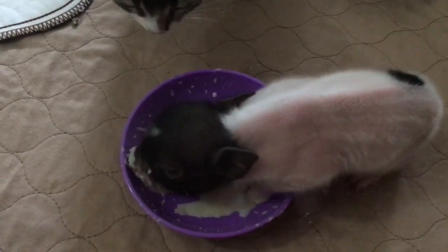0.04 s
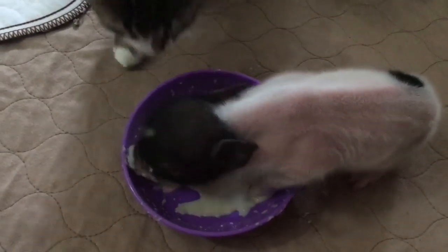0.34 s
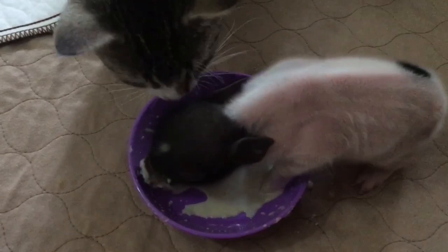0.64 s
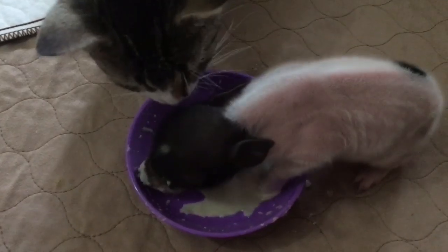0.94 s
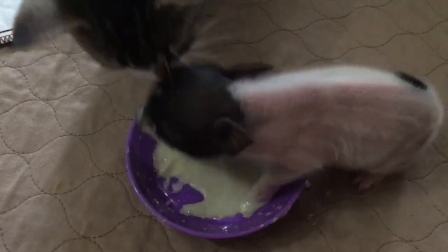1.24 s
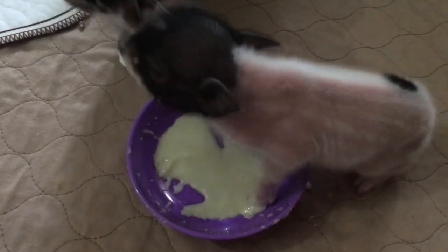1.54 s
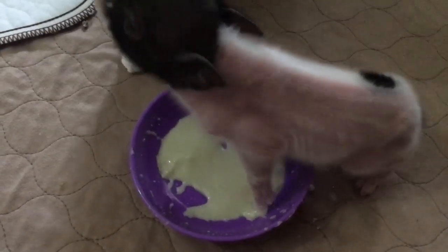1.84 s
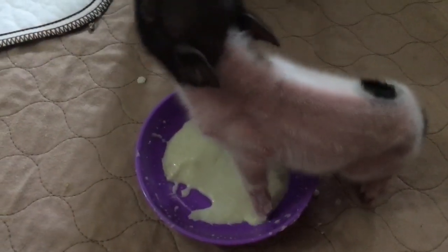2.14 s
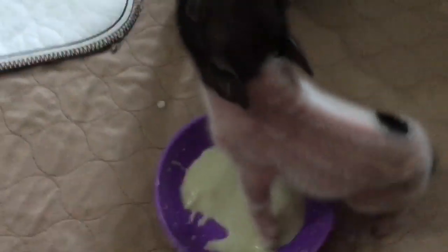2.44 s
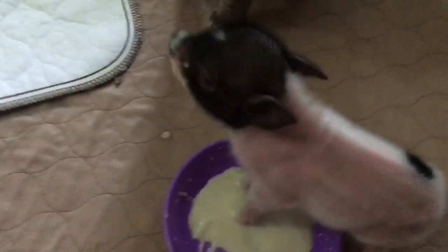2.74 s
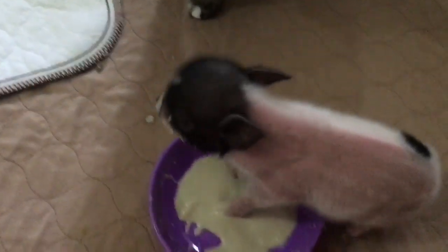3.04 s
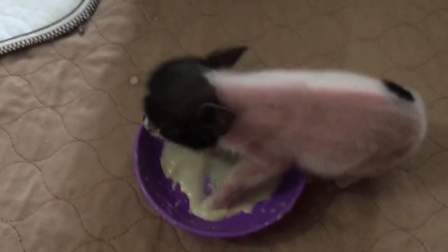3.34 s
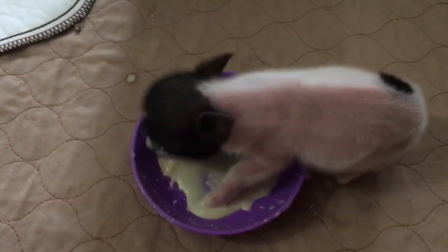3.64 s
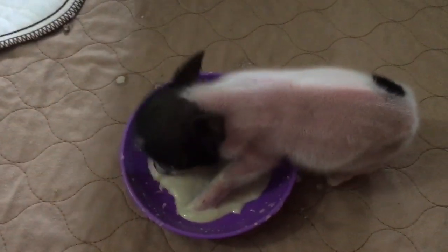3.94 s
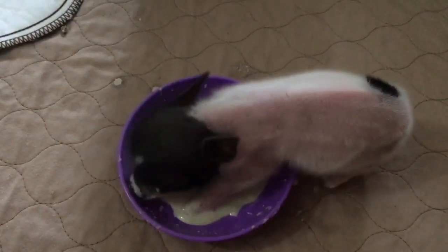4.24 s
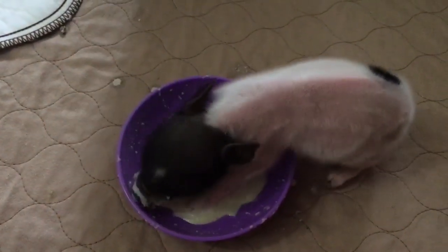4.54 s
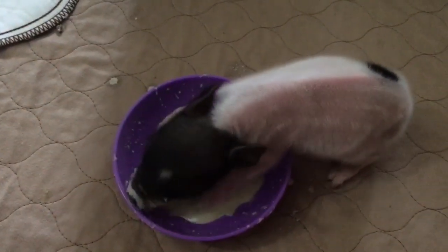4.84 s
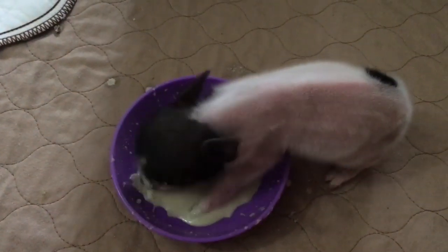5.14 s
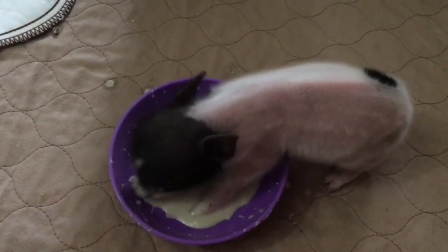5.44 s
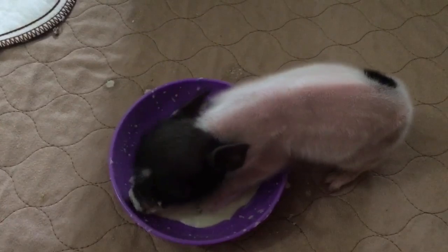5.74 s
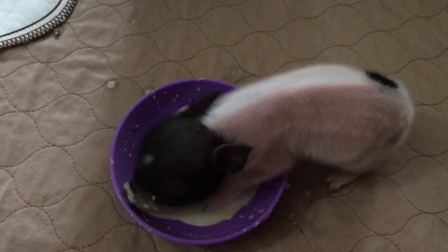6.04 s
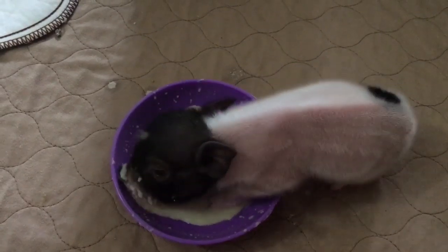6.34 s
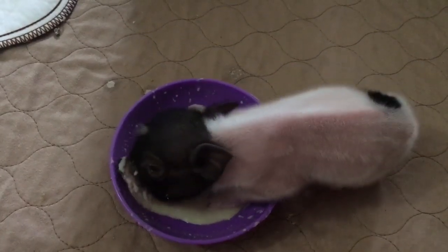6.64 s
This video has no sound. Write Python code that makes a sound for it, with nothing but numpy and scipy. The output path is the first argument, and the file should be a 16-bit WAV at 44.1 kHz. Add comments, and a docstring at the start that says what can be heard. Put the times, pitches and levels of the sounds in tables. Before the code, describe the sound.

A steady low hum and fan rumble fill a small room while a piglet feeds quietly, with tiny wet smacks and soft shuffling.

```python
"""An appliance hums at twice the mains rate and its fan rumbles, making a small room ring.
More quietly, a piglet laps milky food from a plastic bowl on a quilt, about a metre below a phone.
Its wet lips and tongue part with tiny snaps that ring little pockets of air. Froth pops, its snout
nudges and rubs the bowl, and it shuffles softly on the cloth. A faint far tone comes and goes once."""
import sys
import numpy as np
from scipy import signal
from scipy.fft import rfft, irfft
from scipy.io import wavfile

SR = 44100
rng = np.random.default_rng(int(sys.argv[2]) if len(sys.argv) > 2 else 0)


def inscribe(sig):
    """Save sig as 16-bit PCM at rate SR to the path in sys.argv[1].

    A 1-D sig is mono; a 2-D sig holds one channel per row.
    Samples are clipped to [-1, 1] before scaling.
    """
    pcm = np.round(np.clip(np.atleast_2d(sig).T, -1, 1) * 32767)
    wavfile.write(sys.argv[1], SR, pcm.astype(np.int16))


N = 303849
TIME = np.arange(N) / SR
FREQS = np.maximum(np.fft.rfftfreq(N, 1 / SR), 1)
TOP_HZ = 16950  # the highest pitch the phone lets through


def undb(db):
    """Turn decibels into a number to multiply a sound by."""
    return 10 ** (np.asarray(db) / 20)


def unit(x):
    """Scale to an average size (rms) of 1."""
    return x / np.sqrt(np.mean(x ** 2))


def colour(points):
    """A gain for every frequency, joining up (pitch_hz, level_db) points."""
    hz, db = np.transpose(points)
    return undb(np.interp(np.log(FREQS), np.log(hz), db))


def shaped(x, gain):
    """Filter by a gain for every frequency, so that ringing follows a click and does not lead it."""
    cepstrum = irfft(np.log(gain + 1e-9), N)
    cepstrum[1:N // 2] *= 2
    cepstrum[N // 2:] = 0
    return irfft(rfft(x) * np.exp(rfft(cepstrum)), N)


def resonance(hz, width, freqs=FREQS):
    """A gain that peaks at one pitch and falls away on both sides."""
    return 1 / (1 + 2 * ((freqs - hz) / width) ** 2)


def noise(density):
    """Noise with the given strength (amplitude per root Hz) at each frequency."""
    return irfft(rfft(rng.standard_normal(N)) * density * np.sqrt(SR / 2), N)


def drift(rate_hz):
    """A smooth random wobble of about 1 either way."""
    return unit(irfft(rfft(rng.standard_normal(N)) * np.exp(-(FREQS / rate_hz) ** 2), N))


def fade(t, t60):
    """Die away by 60 dB in t60 seconds; the tables call this time fade_s."""
    return np.exp(-np.log(1000) * t / t60)


def add(track, s, sound):
    """Mix a sound into the track, starting s seconds in."""
    i = int(np.clip(s * SR, 0, N - 1))
    track[i:i + len(sound)] += sound[:N - i]


def room(x, echo_db=-16, t60=0.083):
    """The softly furnished room adds a faint, short echo."""
    t = TIME[:SR // 3]
    tail = rng.standard_normal(len(t)) * fade(t, t60) * (1 - fade(t, 0.024))
    return x + undb(echo_db) * signal.fftconvolve(x, tail / np.linalg.norm(tail))[:N]


def far_tone(pitch_hz=427, peak_s=2.15, swell_s=0.11, waver=0.0203, flicker_db=5.5):
    """A faint, unsteady tone swells and fades somewhere further off."""
    # the pure tones it is made of: pitch_multiple, level_db
    partials = [(1, -64.5), (3, -67), (4, -74)]
    phase = 2 * np.pi * np.cumsum(pitch_hz * (1 + waver * drift(22.7))) / SR
    tone = sum(undb(db) * np.sin(k * phase) for k, db in partials)
    swell = np.exp(-((TIME - peak_s) / swell_s) ** 2)
    return np.sqrt(2) * tone * undb(flicker_db * drift(20)) * swell


def fan_whirr(pitch_hz=616, width_hz=27, swell_s=0.048):
    """The fan's whirr swells for a moment now and then."""
    # brief swells: peak_s, level_db
    swells = [(.38, -62), (5.07, -60), (5.43, -59)]
    loudness = sum(undb(db) * np.exp(-((TIME - s) / swell_s) ** 2) for s, db in swells)
    return loudness * unit(noise(resonance(pitch_hz, width_hz)))


def fan_rumble(swell_db=0.54):
    """Swirling air from the fan makes the room and the casing ring."""
    # the rush of moving air: pitch_hz, level_db_per_hz
    rush = [(18, -120), (32, -96), (44, -73), (70, -66.5), (130, -75.5), (200, -78), (340, -86.5),
            (700, -90.5), (1000, -92.5), (1450, -96), (1850, -95.5), (2700, -104), (3500, -108),
            (17000, -145)]
    # pitches at which room and casing ring: pitch_hz, width_hz, level_db_per_hz
    modes = [(80.3, 6, -59), (97.2, 18, -58), (128, 4.1, -71.5), (167.3, 9.9, -66), (260.7, 13, -75.5),
             (303, 14, -87), (572, 33, -86.5), (617, 55, -84), (682, 9.3, -86), (767, 11, -86.5),
             (902, 15, -88.5), (1056, 20, -92), (1210, 120, -96.5), (1324, 27, -95), (1730, 110, -99),
             (1920, 55, -100), (3320, 310, -111)]
    ring_power = sum((undb(db) * resonance(hz, width)) ** 2 for hz, width, db in modes)
    return noise(np.sqrt(colour(rush) ** 2 + ring_power)) * undb(swell_db * drift(13))


def appliance(mains_hz=60.016, wander_radians=0.93, waver_db=1.5):
    """The motor's hum is locked to the mains electricity; the fan's tones wander a little."""
    # motor hum: mains_multiple, level_db
    hum_tones = [(1, -72), (2, -36), (4, -52), (6, -76.5), (18, -82), (20, -82.5), (22, -76)]
    # tones of the fan: pitch_hz, level_db
    fan_tones = [(42.3, -78), (75.5, -68.5), (296, -68), (619, -76), (740, -74)]
    out = sum(undb(db) * np.cos(2 * np.pi * k * mains_hz * TIME) for k, db in hum_tones)
    for hz, db in fan_tones:
        loudness = undb(db + waver_db * drift(1.1))
        out += loudness * np.cos(2 * np.pi * hz * TIME + wander_radians * drift(3.3))
    return np.sqrt(2) * out


def effort_db(t, rise_s=0.1):
    """How busily the piglet moves at time t: rustles swell and die away over its fidgeting."""
    # fidgeting, which settles once the piglet is back at the bowl: time_s, level_db
    fidget = [(0, -68), (2.2, -71), (3.1, -71.5), (3.8, -91.5), (5.6, -76.5), (6.89, -70)]
    # rustles as it shifts its weight: peak_s, level_db, fade_s
    rustles = [(.08, -65.5, 1.1), (.39, -66, 2.5), (1.47, -64.5, 1.8), (1.9, -62, 1.2), (2.13, -63.5, 0.69),
               (2.55, -65, 1.1), (3.22, -67, 0.59), (4.55, -69, 1.3), (6.29, -66.5, 1), (6.69, -65, 0.99)]
    power = undb(np.interp(t, *np.transpose(fidget))) ** 2
    for s, db, t60 in rustles:
        swell = np.clip(1 + (t - s) / rise_s, 0, 1)
        power += (undb(db) * swell * fade(np.maximum(t - s, 0), t60)) ** 2
    return 10 * np.log10(power)


def shuffle(grain_db=-1.5, catch_db=3.5, flicker_db=1.5):
    """Cloth fibres catch and slip in clumps of tiny clicks as the piglet shifts."""
    # tone colour of the quilt: pitch_hz, gain_db
    cloth = [(500, 16), (1800, 19.5), (3200, -0.5), (5000, 1.5), (7500, -2.5), (9200, 3), (12300, -2),
             (17000, -7)]
    fibres = rng.standard_normal(N) * undb(grain_db * rng.standard_normal(N) + catch_db * drift(350))
    return unit(shaped(fibres, colour(cloth))) * undb(effort_db(TIME) + flicker_db * drift(16))


def nudges(rise_share=0.13):
    """Dull knocks and scuffs on the bowl, muffled by the food and the quilt."""
    # pushes of snout and feet: start_s, pitch_hz, level_db, fade_s
    pushes = [(0.299, 162, -46, 0.85), (0.857, 1450, -57, 0.051), (1.883, 1400, -51, 0.027),
              (2.5, 55, -40, 0.45), (2.735, 1750, -53, 0.065), (2.952, 330, -55, 0.074),
              (2.955, 800, -56, 0.052), (3.025, 265, -47, 0.093), (3.027, 980, -50.5, 0.043),
              (6.13, 1700, -58.5, 0.14)]
    out, t = np.zeros(N), TIME[:SR // 2]
    freqs = np.fft.rfftfreq(len(t), 1 / SR)
    for s, hz, db, t60 in pushes:
        rise_s = rise_share * t60  # a softer push lasts longer
        spectrum = rfft(rng.standard_normal(len(t))) * resonance(hz, hz / 2, freqs)
        swell = np.minimum(t / rise_s, 1) * fade(np.maximum(t - rise_s, 0), t60)
        add(out, s, undb(db) * unit(irfft(spectrum, len(t))) * swell)
    return out


def snout_rub(start_s=1.876, length_s=0.1, slip_hz=204, level_db=-51, jitter=0.048, spread_db=2.5):
    """The snout sticks and slips on the wet bowl: a tiny creak, strongest in the middle."""
    # tone colour of the creak: pitch_hz, gain_db
    creak = [(1500, -6), (4000, -4), (9000, 0), (13000, 5), (17000, -2)]
    slips = np.zeros(N)
    for k, (late, size) in enumerate(rng.standard_normal((40, 2))):
        age = (k + jitter * late) / slip_hz
        arch = np.sin(np.pi * np.clip(age / length_s, 0, 1))
        add(slips, start_s + age, [arch * undb(level_db + spread_db * size)])
    return shaped(slips, colour(creak))


def slurps(grain_db=5):
    """Food sucked through the lips makes a fine, high fizz that swells and fades."""
    # sucks of food: start_s, length_s, pitch_hz, width_hz, level_db
    sucks = [(2.128, 0.078, 8300, 1600, -77), (2.805, 0.045, 11000, 3000, -81),
             (6.65, 0.28, 10900, 5000, -80)]
    out = np.zeros(N)
    for s, length, hz, width, db in sucks:
        progress = np.clip((TIME - s) / length, 0, 1)
        arch = np.sqrt(np.abs(np.sin(np.pi * progress)))
        out += undb(db) * arch * unit(noise(resonance(hz, width)))
    return out * undb(grain_db * drift(400))


def air_pocket(t, hz, t60, glide):
    """A small pocket of air rings, and its pitch creeps up as it opens."""
    pitch_hz = hz * (1 + glide * (np.minimum(t / t60, 1) - 0.2))
    phase = 2 * np.pi * np.cumsum(np.minimum(pitch_hz, SR / 2)) / SR
    return np.sqrt(2) * np.sin(phase) * fade(t, t60) * (1 - fade(t, 0.0009))


def wet_ticks(squelch_bubbles=20, t60=0.0025, glide=0.05, scatter=0.13, spread_db=3):
    """Tiny high ticks ring out; in a squelch a run of bubbles bursts, growing higher and louder."""
    # froth pops, and the bright top of two tongue clucks: start_s, pitch_hz, level_db
    ticks = [(.2855, 13500, -52), (.2905, 13500, -47), (.547, 13000, -54), (.6116, 13200, -52),
             (.698, 13000, -51), (.771, 12000, -55), (.942, 10000, -51), (1.001, 13500, -51),
             (1.201, 11700, -55), (1.3177, 12300, -49), (1.374, 13000, -51), (2.047, 11500, -51),
             (3.064, 13000, -55), (4.463, 9200, -53), (4.585, 14200, -55), (4.645, 9500, -56),
             (4.72, 11000, -54), (5.342, 14500, -52)]
    # the two ends of the squelch: time_s, pitch_hz, level_db
    squelch = [(6.315, 11500, -60), (6.353, 13300, -53)]
    out, t = np.zeros(N), TIME[:SR // 50]
    for s, hz, db in ticks:
        add(out, s, undb(db) * air_pocket(t, hz, t60, glide))
    first, last = np.array(squelch)
    for k, (late, pitch, size) in enumerate(rng.uniform(-1, 1, (squelch_bubbles, 3))):
        s, hz, db = first + (last - first) * (k + 0.5 + late / 2) / squelch_bubbles
        add(out, s, undb(db + spread_db * size) * air_pocket(t, hz * (1 + scatter * pitch), t60, glide))
    return out


def lapping(count=600, base_db=-65, follow=0.37, spread_db=4.5, low_hz=3500, high_hz=15000):
    """Tiny bubbles burst around the snout, a little louder when the piglet is busier."""
    out, usual_db = np.zeros(N), np.mean(effort_db(TIME))
    for when, pitch, chance in rng.random((count, 3)):
        s, hz = when * N / SR, low_hz + (high_hz - low_hz) * pitch
        size = min(-np.log(chance), 3)  # most are faint, a few stand out
        db = base_db + follow * (effort_db(s) - usual_db) + spread_db * size
        add(out, s, undb(db) * air_pocket(TIME[:SR // 50], hz, t60=0.0011, glide=0.1))
    return out


def snap(t, hz, t60, grain_db=10.5, lowest_share=0.15):
    """A wet film tears in a burst of tiny clicks, with little sound far below its air pocket's pitch."""
    clicks, size = rng.standard_normal((2, len(t)))
    low_cut = signal.butter(2, lowest_share * hz, "high", fs=SR, output="sos")
    tear = signal.sosfilt(low_cut, clicks * undb(grain_db * size) * fade(t, t60))
    return tear / np.linalg.norm(tear)


def smacks(glide=0.032, tongue_fade_s=0.0033):
    """A film snaps at the lips and rings the air behind it; one at the tongue rings the whole mouth."""
    # lip smacks: start_s, pitch_hz, ring_db, ring_fade_s, snap_db, snap_fade_s
    lip_smacks = [(0.3662, 9100, -47, .002, -42, .005), (0.6404, 3300, -46, .007, -58, .005),
                  (0.6494, 4050, -44, 0.0044, -53, .005), (0.859, 1900, -44, 0.0051, -40, .014),
                  (0.8867, 3000, -46, 0.0028, -40.5, .006), (1.4638, 1910, -40, 0.0042, -42, .016),
                  (1.472, 14000, -51, .003, -44, .015), (1.596, 6600, -50, .002, -48, .005),
                  (1.631, 4030, -50.5, 0.0037, -54, .005), (1.838, 4300, -45, .002, -37, .009),
                  (1.8403, 5230, -35, 0.0023, -32, .009), (1.8426, 4200, -36, .0023, -30, .009),
                  (1.8435, 1650, -45, 0.0047, -33, .012), (1.8453, 3520, -38, 0.0033, -32, 0.015),
                  (2.1214, 12100, -47, 0.003, -36, .008), (2.1236, 5350, -46, .002, -37, .006),
                  (2.7437, 1800, -46, .005, -36, .011), (2.756, 14800, -52, .003, -45, .005),
                  (2.7905, 3460, -48, 0.014, -60, .005), (3.1906, 8100, -36.5, 0.0026, -41, .006),
                  (3.1926, 9400, -39.5, 0.0066, -36, .01), (3.1959, 9400, -43, 0.0033, -43, .005),
                  (3.2052, 9500, -49, .005, -41, .006), (3.2126, 9800, -42, 0.0024, -42, .003),
                  (4.1355, 4830, -42, 0.0022, -46, .002), (4.142, 3900, -53, .004, -58, .004),
                  (4.361, 3680, -47.5, 0.01, -51, .004), (4.362, 7000, -55, .003, -58, .004),
                  (4.66, 1890, -49, .006, -53, .008), (4.748, 3720, -49.5, 0.0083, -43, .008),
                  (5.0593, 3870, -51, .008, -51, .008), (6.6359, 8700, -44, 0.0029, -41, .006)]
    # tone colour of a lip snap: pitch_hz, gain_db
    lip_colour = [(1000, -18), (2200, 7.5), (4000, 3), (6000, 2), (9200, 6), (11500, 1.5), (13500, -1),
                  (17000, -17)]
    # tongue clucks: start_s, lowest_pitch_hz, ring_db, snap_db
    clucks = [(0.2906, 2730, -36.5, -33), (0.6114, 2770, -43.5, -42), (4.809, 2600, -53, -54),
              (5.0444, 2530, -36.5, -48), (5.055, 2650, -54, -53), (5.064, 2650, -45, -39),
              (6.257, 2590, -54, -46)]
    # pitches at which the mouth rings: ratio_to_lowest, gain_db, fade_s
    mouth = [(1, -0.5, 0.0078), (1.52, -14.5, 0.0068), (3.6, -15, 0.0038)]
    # tone colour of a tongue snap, heard through the mouth: pitch_hz, gain_db
    tongue_colour = [(1200, -7), (2600, 5), (4000, 5), (5200, -4), (7200, -5), (9000, 4), (12500, -4),
                     (17000, -10)]
    rings, lip_snaps, tongue_snaps = np.zeros((3, N))
    t = TIME[:SR // 25]
    for s, hz, ring_db, t60, snap_db, snap_t60 in lip_smacks:
        add(rings, s, undb(ring_db) * air_pocket(t, hz, t60, glide))
        add(lip_snaps, s, undb(snap_db) * snap(t, hz, snap_t60))
    for s, hz, ring_db, snap_db in clucks:
        for ratio, db, t60 in mouth:
            add(rings, s, undb(ring_db + db) * air_pocket(t, ratio * hz, t60, glide))
        add(tongue_snaps, s, undb(snap_db) * snap(t, hz, tongue_fade_s))
    lips = shaped(lip_snaps, unit(colour(lip_colour)))
    tongue = shaped(tongue_snaps, unit(colour(tongue_colour)))
    return rings + lips + tongue


def scene():
    """The piglet feeds under the steady hum and rumble of the appliance."""
    piglet = room(smacks() + lapping() + wet_ticks() + slurps() + snout_rub() + nudges()) + shuffle()
    return (piglet + appliance() + fan_rumble() + fan_whirr() + far_tone())[None]


def record(dry):
    """The phone adds a thin hiss, dulls a few high pitches and cuts off the very highest."""
    # hiss of the microphone: pitch_hz, level_db_per_hz
    hiss = [(3000, -117), (5600, -115.5), (7500, -119.5), (8500, -115.5), (9700, -117), (12000, -119),
            (14000, -122), (17000, -123)]
    # narrow dips caused by the microphone's opening: pitch_hz, width_hz, gain_db
    dips = [(2930, 55, -6.5), (4960, 97, -8), (10520, 320, -7.5)]
    opening = undb(sum(db * resonance(hz, width) for hz, width, db in dips))
    heard = shaped(dry + noise(colour(hiss)), opening)
    high_cut = signal.ellip(10, 0.1, 80, TOP_HZ, fs=SR, output="sos")
    return signal.sosfilt(high_cut, heard)


dry = scene()
out = record(dry)
inscribe(out)
```